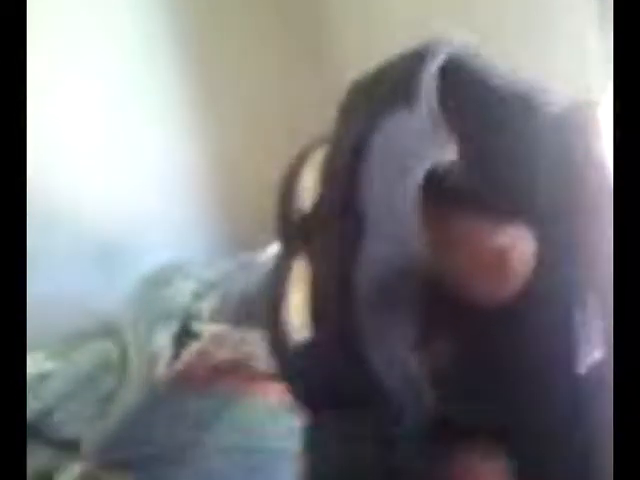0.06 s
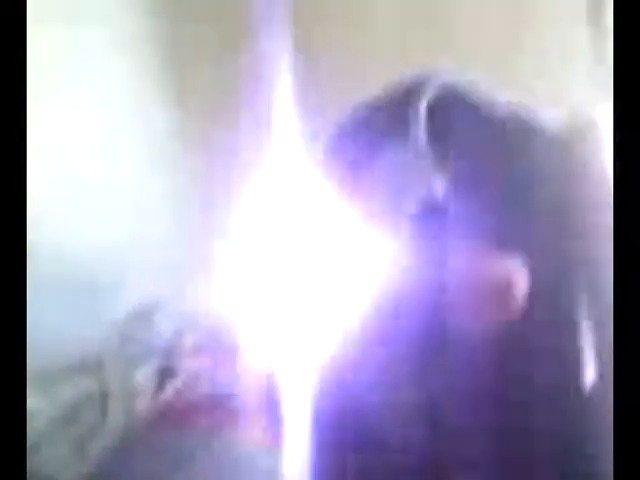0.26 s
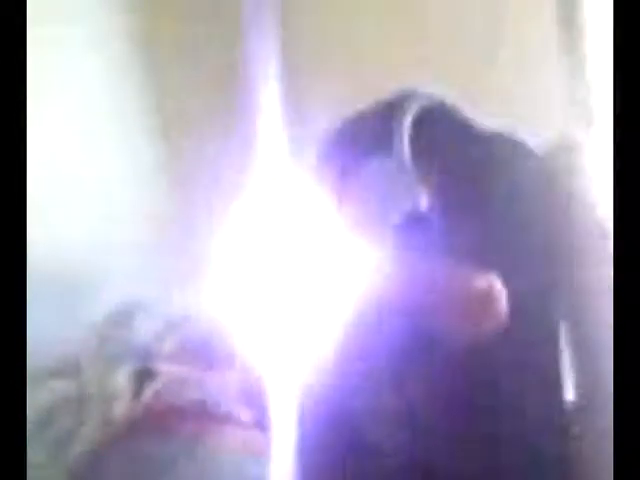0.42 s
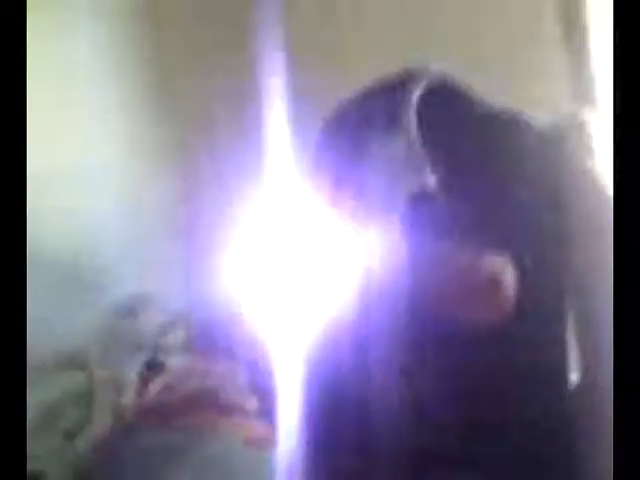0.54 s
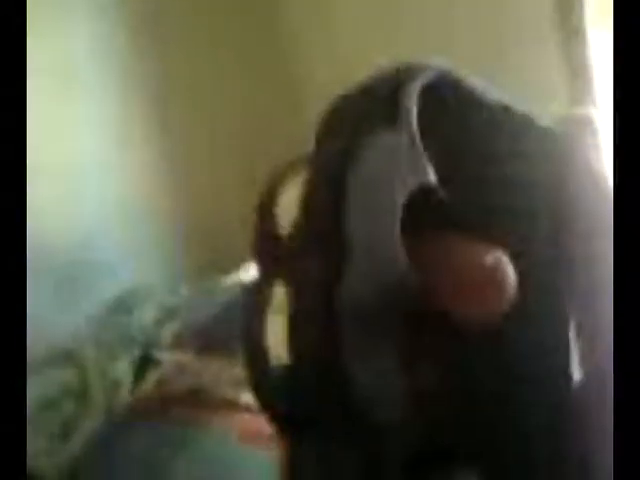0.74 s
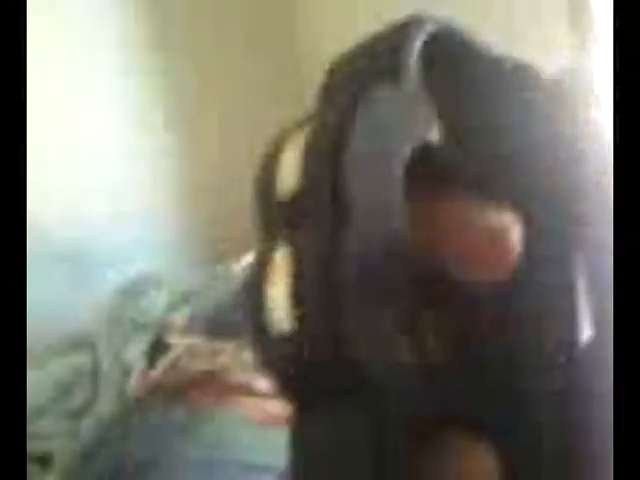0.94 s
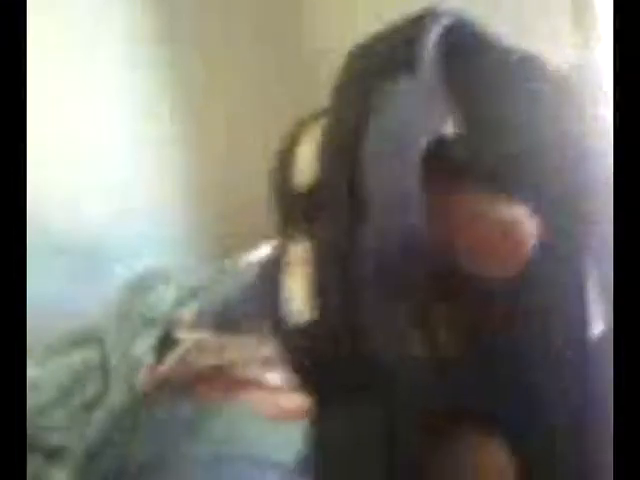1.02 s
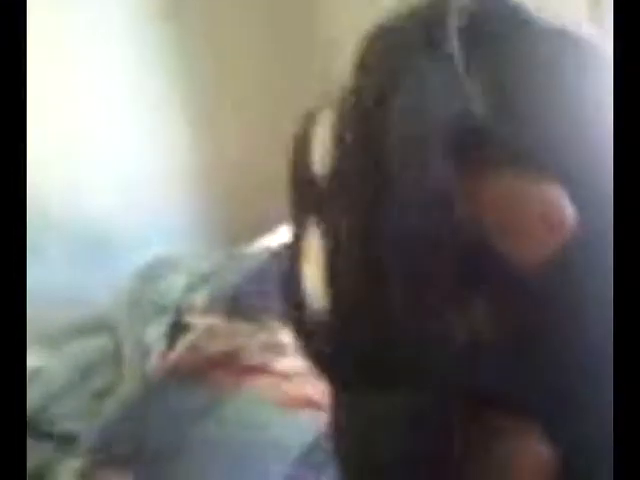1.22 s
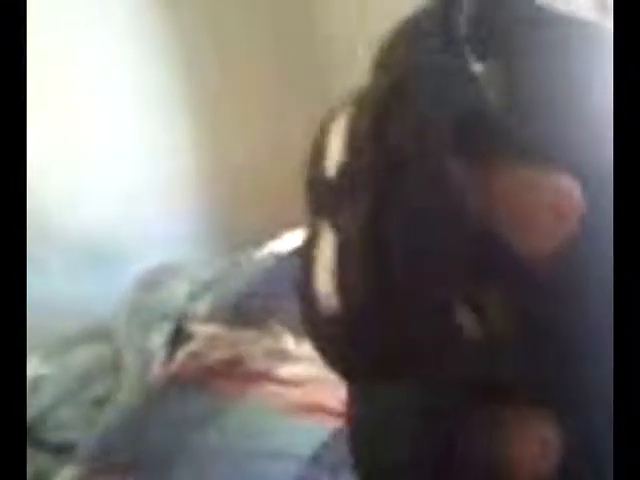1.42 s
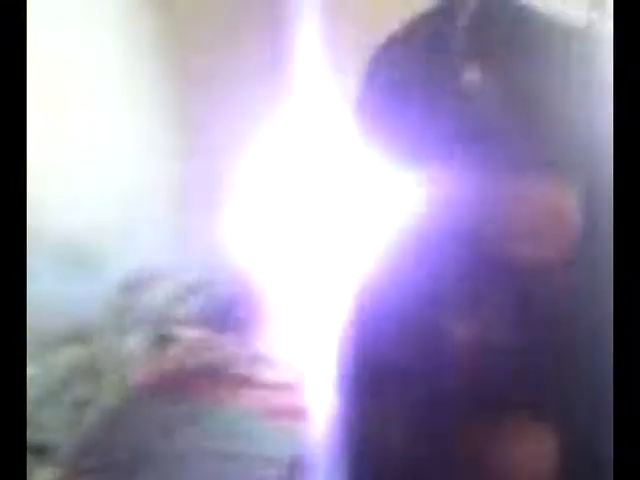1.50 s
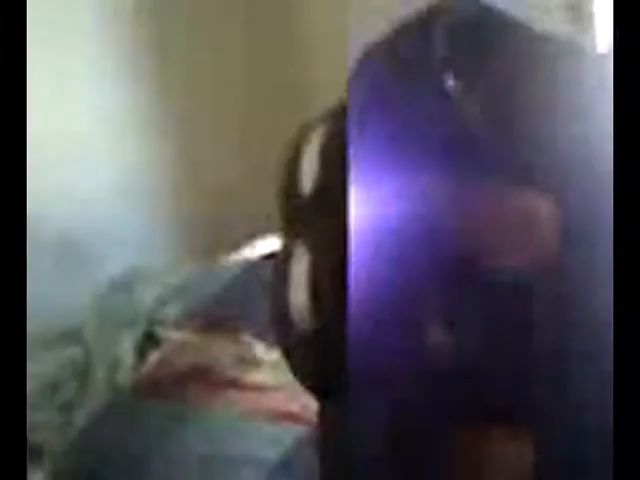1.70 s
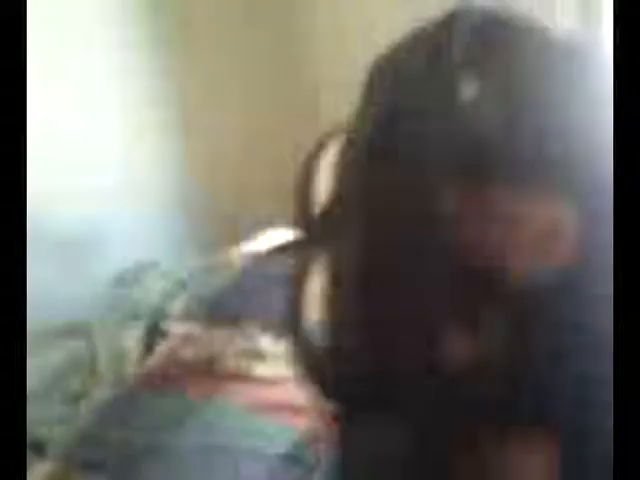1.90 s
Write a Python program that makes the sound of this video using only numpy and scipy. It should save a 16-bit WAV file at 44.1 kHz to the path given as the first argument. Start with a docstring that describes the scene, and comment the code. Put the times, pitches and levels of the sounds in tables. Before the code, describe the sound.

A stun gun crackles close to a narrow-sounding microphone in a small room. The trigger clicks, and from 0.2 to 0.6 seconds rapid sparks buzz and snap loudly, ringing briefly and overloading the microphone with low pops. A faint hush follows, with a few soft handling ticks around 1 second. At 1.4 seconds another click starts a shorter burst, which stops just after 1.6 seconds.

```python
"""A small room, a microphone close to a handheld stun gun, heard through a narrow band that ends below 5 kHz.
Over a faint hush the trigger clicks, and at 0.2 s sparks start to jump the gap some 320 times a second: each a
one-sided snap with a low sputter, and a bright crack that rings on in the room. The microphone overloads with
low pops, and the hardest sparks stand out of the crackle. The arc stops at 0.6 s, leaving a few faint handling
ticks. At 1.4 s the trigger clicks again for a second, shorter burst."""
import sys
import numpy as np
from scipy import signal
from scipy.fft import rfft, irfft, next_fast_len
from scipy.io import wavfile
from scipy.ndimage import uniform_filter1d

SR = 44100
rng = np.random.default_rng(int(sys.argv[2]) if len(sys.argv) > 2 else 0)


def log_audio(samples):
    """Write samples as a 16-bit WAV file to the path given in sys.argv[1]."""
    # one column per channel
    frames = np.atleast_2d(samples).T
    # limit to full scale, then quantise
    limited = np.clip(frames, -1, 1)
    pcm = np.round(limited * 32767).astype(np.int16)
    wavfile.write(sys.argv[1], SR, pcm)


N = 85995

# the band the recorder passes: frequency_hz, gain_db
RECORDER_BAND = [(10, -1), (3400, -1), (3620, -7.5), (3850, -19), (4150, -21.5), (4550, -19.5),
                 (4800, -26), (5050, -41), (5350, -77), (6000, -120)]
# room tone: frequency_hz, level_db
HUSH_SPECTRUM = [(15, -54.5), (25, -19.5), (42, -10.5), (66, -1.5), (257, -5), (390, -10), (445, -7.5),
                 (567, -12), (1220, -12.5), (1520, -15), (2760, -21.5), (4780, -25), (6210, -64),
                 (10500, -120)]
# trigger clicks (first and last) and handling ticks: start_s, level_db
CLICK_EVENTS = [(0.1813, -29), (0.9443, -55.5), (1.001, -60), (1.060, -62), (1.086, -58), (1.4175, -33)]
# tone of a plastic click: frequency_hz, level_db
CLICK_SPECTRUM = [(60, -6), (400, -2), (1300, -8), (2000, -1), (3000, -0.5), (5000, -4)]
# when the arc burns: start_s, stop_s
ARC_BURSTS = [(0.2027, 0.59), (1.4337, 1.6315)]
# relative strength of the sparks, one list a burst: time_s, crack_db, sputter_db
ARC_STRENGTH = [
    [(0.203, -18.5, -29.5), (0.24, -16, -26), (0.27, -22, -27), (0.335, -20.5, -24), (0.36, -19.5, -21.5),
     (0.395, -18.5, -24), (0.425, -18.5, -23.5), (0.47, -22, -24.5), (0.505, -19, -27), (0.53, -22.5, -24),
     (0.575, -19.5, -30), (0.594, -24, -37)],
    [(1.434, -18, -30.5), (1.455, -25, -17), (1.476, -24, -25.5), (1.50, -23, -25), (1.545, -18.5, -25.5),
     (1.58, -19.5, -23.5), (1.615, -18.5, -26), (1.632, -21, -31)],
]
# a spark's bright crack: frequency_hz, level_db
CRACK_SPECTRUM = [(30, -20.5), (300, -18), (600, -13), (950, -14.5), (1400, -10.5), (1700, -6.5),
                  (2100, -0.5), (2450, -5.5), (2900, -0.5), (3400, 1), (5000, -0.5)]
# a spark's low sputter: frequency_hz, level_db
SPUTTER_SPECTRUM = [(15, -0.5), (40, -5), (110, 5), (300, 1.5), (700, -1.5), (1200, -10), (2000, -9),
                    (5000, -10.5)]
# decay of the small room: frequency_hz, t60_s
ROOM_DECAY = [(100, 0.13), (500, 0.2), (1400, 0.31), (3200, 0.34), (5000, 0.34)]
# modes of the casing and things near it: pitch_hz, level_db, t60_s
CASING_MODES = [(1370, -12, .14), (1721, -11, 0.039), (1990, 0, 0.16), (2060, -5, .1), (2380, -1.5, 0.3),
                (2520, -3, .09), (2895, 1, .13), (2984, -6, 0.06), (3240, 0, 0.05), (3270, -5, 0.12),
                (3370, -1, 0.13)]
# low pops of the overloaded microphone: centre_s, signed_height, half_width_s
OVERLOAD_POPS = [(0.2060, .2, .0025), (0.3480, .45, .0006), (0.3530, -.42, .0014), (0.3733, .3, .0016),
                 (0.4152, -.22, .001), (0.5420, .16, .0015), (1.4368, .36, .0015), (1.4425, -.09, .004),
                 (1.5030, .13, .001), (1.5415, .13, .0015)]
# single hard sparks: start_s, snap_db, crack_db, sputter_db
HARD_SPARK_EVENTS = [(0.2525, -6, -16, -24), (0.2556, -5, -18, -24), (0.2727, -7, -22, -24),
                     (0.3150, -16, -11, -26), (0.3520, 0.5, -12, -20), (0.3546, -10, -14, -20),
                     (0.3710, -5, -11, -12), (0.3912, -6, -9, -11), (0.4250, -8, -12, -26),
                     (0.4855, -18, -12, -26), (0.5004, -12, -4, -20), (0.5110, -18, -11, -26),
                     (0.5300, -5, -22, -20), (1.4569, 1, -10, -20), (1.4646, -4, -20, -24),
                     (1.4677, -5, -20, -22), (1.4874, -5, -20, -24), (1.4905, -6, -22, -24),
                     (1.5433, -7, -16, -22), (1.5465, -6, -17, -24), (1.5656, -6, -20, -24),
                     (1.5742, -16, -11, -20), (1.5769, 0.5, -11, -17), (1.5935, -18, -12, -18),
                     (1.5959, -4, -13, -18), (1.6040, -14, -16, -13), (1.6066, -5, -17, -15),
                     (1.6258, -9, -10, -14)]

CLICK_T60_S, CRACK_T60_S, SPUTTER_T60_S = 0.025, 0.0097, 0.012
PUFF_RISE_S, SNAP_WIDTH_S = 0.0002, 0.00005
SPARK_RATE_HZ, GAP_JITTER, PUFF_SCATTER_DB, SNAP_SCATTER_DB = 320, 0.14, 2.6, 4
HUSH_DB, SPUTTER_DB, SNAP_DB = -59, -0.5, -3
ARC_ROOM_DB, RING_DB, HARD_ROOM_DB = 2.5, -9, -3
SNAP_ROOM_DB, SNAP_ROOM_HZ = -7.5, 250  # the room's answer to the snaps, and the pitch below which it fades
TOP_HZ = 15870


def amp(db):
    """Decibels to gain."""
    return 10 ** (np.asarray(db) / 20)


def rms(x):
    """Root mean square."""
    return np.sqrt(np.mean(x ** 2) + 1e-20)


def along(points, hz):
    """Read (frequency_hz, value) points at hz, on a log frequency axis."""
    frequencies, values = np.transpose(points)
    return np.interp(np.log(hz + 1), np.log(np.sort(frequencies) + 1), values)


def filtered(x, response):
    """x through a gain given as a function of frequency."""
    size = next_fast_len(N + SR // 2)
    return irfft(rfft(x, size) * response(np.fft.rfftfreq(size, 1 / SR)), size)[:N]


def coloured(x, spectrum):
    """x through a curve of (frequency_hz, gain_db) points."""
    return filtered(x, lambda hz: amp(along(spectrum, hz)))


def heard(x):
    """x within the recorder's band."""
    return coloured(x, RECORDER_BAND)


def at_level(x, target_rms):
    """x scaled to reach target_rms within the recorder's band."""
    return x * target_rms / rms(heard(x))


def answer(x, response):
    """x played into an impulse response, at the power of x."""
    return at_level(signal.fftconvolve(x, response)[:N], rms(heard(x)))


def impulses(times, sizes):
    """One impulse at each time."""
    return np.bincount(np.round(np.asarray(times) * SR).astype(int), sizes, N)[:N]


def puffs(times, sizes, t60_s, spectrum):
    """A quickly dying puff of noise at each time; overlapping puffs add in power."""
    t = np.arange(SR // 8) / SR
    envelope = (1 - np.exp(-t / PUFF_RISE_S)) * amp(-60 * t / t60_s)
    power = signal.fftconvolve(impulses(times, sizes) ** 2, envelope ** 2)[:N]
    noise = coloured(rng.standard_normal(N), spectrum)
    return np.sqrt(np.abs(power)) * at_level(noise, 1)


def hush():
    """Room tone: faint, steady and mostly low."""
    return at_level(coloured(rng.standard_normal(N), HUSH_SPECTRUM), amp(HUSH_DB))


def clicks():
    """The trigger clicks just before the arc strikes; between bursts the plastic ticks in the hand."""
    start_s, level_db = np.transpose(CLICK_EVENTS)
    return puffs(start_s, amp(level_db), CLICK_T60_S, CLICK_SPECTRUM)


def arc():
    """Sparks jump the gap in an uneven train: returns the cracks, and the snaps with their sputter."""
    cracks, snaps = np.zeros(N), np.zeros(N)
    for (start_s, stop_s), strength in zip(ARC_BURSTS, ARC_STRENGTH):
        chance = rng.standard_normal((200, 3))
        gaps_s = np.exp(GAP_JITTER * chance[:, 0]) / SPARK_RATE_HZ
        times = start_s + np.cumsum(gaps_s) - gaps_s[0]
        burning = times < stop_s
        times, chance = times[burning], np.clip(chance[burning], -2, 2)
        puff_scatter = amp(PUFF_SCATTER_DB * chance[:, 1])
        snap_scatter = amp(SNAP_SCATTER_DB * chance[:, 2])

        time_s, crack_db, sputter_db = np.transpose(strength)
        crack_gain = amp(np.interp(times, time_s, crack_db))
        sputter_gain = amp(np.interp(times, time_s, sputter_db))
        crack = puffs(times, crack_gain * puff_scatter, CRACK_T60_S, CRACK_SPECTRUM)
        sputter = puffs(times, sputter_gain * puff_scatter, SPUTTER_T60_S, SPUTTER_SPECTRUM)
        spikes = impulses(times, sputter_gain * snap_scatter)
        spikes -= uniform_filter1d(spikes, size=SR // 100)  # take out the 10 ms running mean

        share = np.sqrt((stop_s - start_s) * SR / N)  # turns rms over the burst into rms over the scene
        cracks += at_level(crack, rms(crack_gain) * share)
        snaps += amp(SPUTTER_DB) * at_level(sputter, rms(sputter_gain) * share)
        snaps -= amp(SNAP_DB) * at_level(spikes, rms(sputter_gain) * share)
    return cracks, snaps


def room_tail():
    """The room's impulse response: noise whose every frequency dies at its own speed."""
    hz, t, spectra = signal.stft(rng.standard_normal(SR // 2), SR, nperseg=256)
    decay = amp(-60 * t / along(ROOM_DECAY, hz)[:, None])
    return signal.istft(spectra * decay, SR, nperseg=256)[1]


def casing_ring():
    """The damped modes that the arc's cracks set off in the casing and things near it."""
    t = np.arange(SR // 2) / SR
    return sum(amp(db - 60 * t / t60_s) * np.sin(2 * np.pi * hz * t) for hz, db, t60_s in CASING_MODES)


def in_room(cracks):
    """The direct cracks, the room's tail and the casing's ring, at unchanged total power."""
    tail = amp(ARC_ROOM_DB) * answer(cracks, room_tail())
    ring = amp(RING_DB) * answer(cracks, casing_ring())
    return at_level(cracks + tail + ring, rms(heard(cracks)))


def microphone_pops():
    """Slow one-sided swings of the overloaded microphone."""
    t = np.arange(N) / SR
    return sum(height * np.exp(-((t - centre_s) / half_width_s) ** 2)
               for centre_s, height, half_width_s in OVERLOAD_POPS)


def hard_sparks():
    """The strongest discharges: returns the cracks, and the one-sided snaps with their sputter."""
    start_s, snap_db, crack_db, sputter_db = np.transpose(HARD_SPARK_EVENTS)
    t = (np.arange(N) - N // 2) / SR
    pulse = np.exp(-(t / SNAP_WIDTH_S) ** 2)
    snaps = signal.fftconvolve(impulses(start_s, amp(snap_db)), pulse / heard(pulse).max(), "same")
    sputter = puffs(start_s, amp(sputter_db), SPUTTER_T60_S, SPUTTER_SPECTRUM)
    cracks = puffs(start_s, amp(crack_db), CRACK_T60_S, CRACK_SPECTRUM)
    return cracks, sputter - snaps


def scene():
    """The arc's cracks fill the room, hard sparks stand in front, pops and clicks stay close and dry."""
    cracks, arc_snaps = arc()
    hard_cracks, hard_snaps = hard_sparks()
    snaps = arc_snaps + hard_snaps
    radiated_snaps = filtered(snaps, lambda hz: hz ** 2 / (hz ** 2 + SNAP_ROOM_HZ ** 2))
    tail = answer(amp(SNAP_ROOM_DB) * radiated_snaps + amp(HARD_ROOM_DB) * hard_cracks, room_tail())
    return (in_room(cracks) + hard_cracks + snaps + tail + microphone_pops() + clicks() + hush())[None]


def record(dry):
    """One close microphone into a narrow-band recorder; the tallest snaps clip at full scale."""
    clipped = np.clip(heard(dry[0]), -1, 1)
    return filtered(clipped, lambda hz: hz < TOP_HZ)[None]


dry = scene()
out = record(dry)
log_audio(out)
```